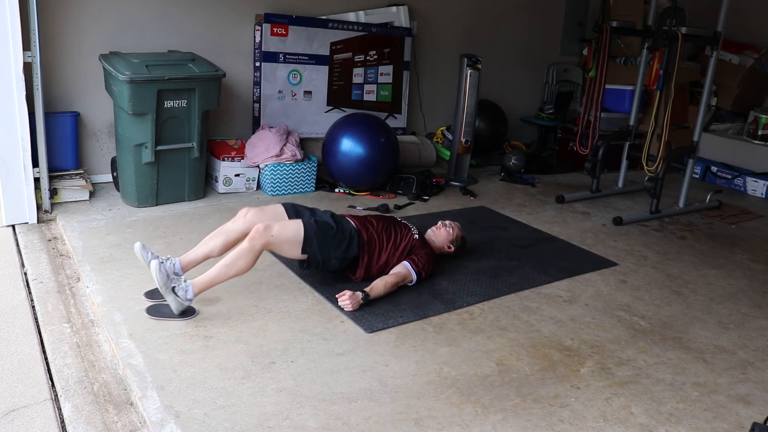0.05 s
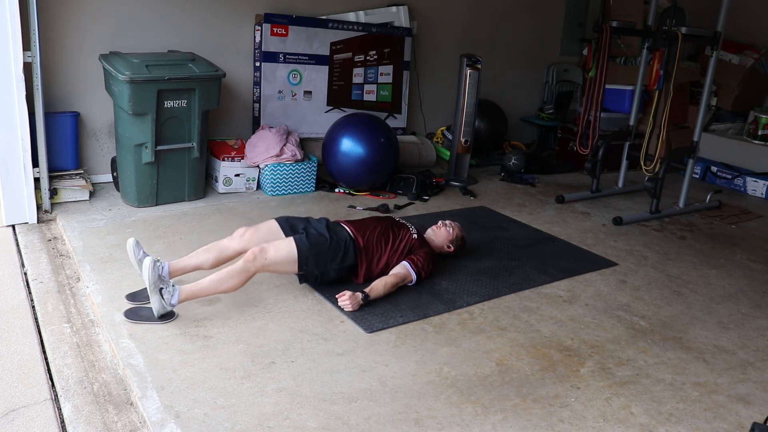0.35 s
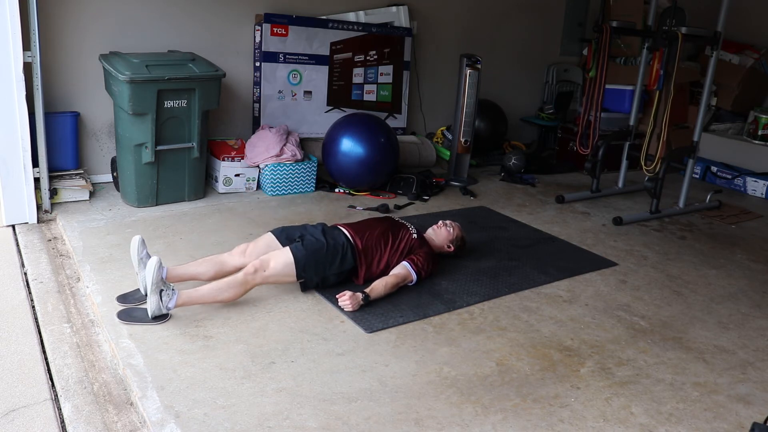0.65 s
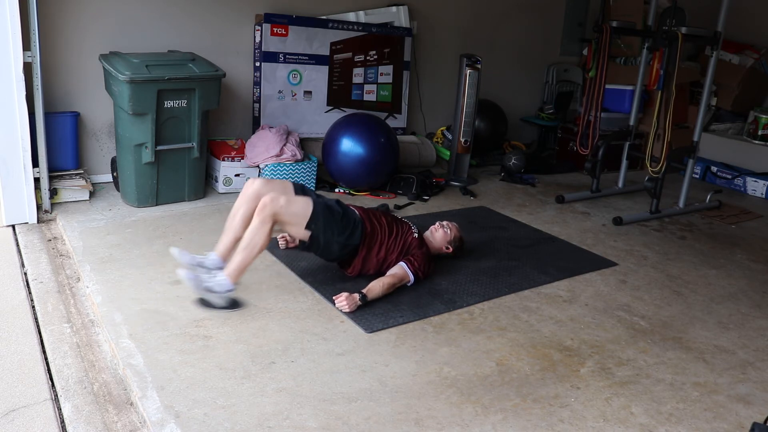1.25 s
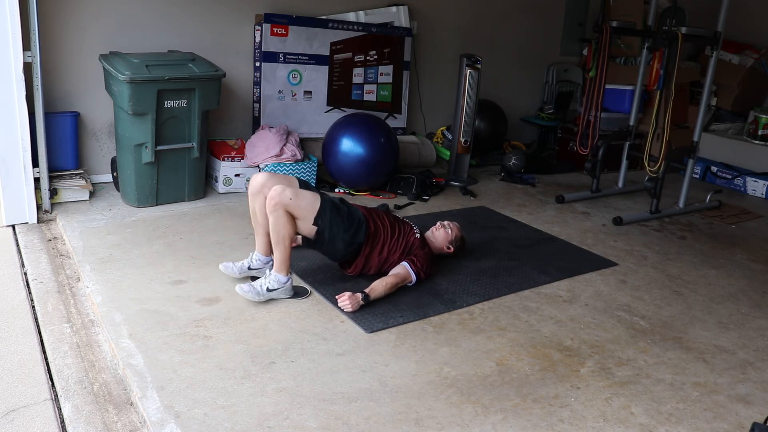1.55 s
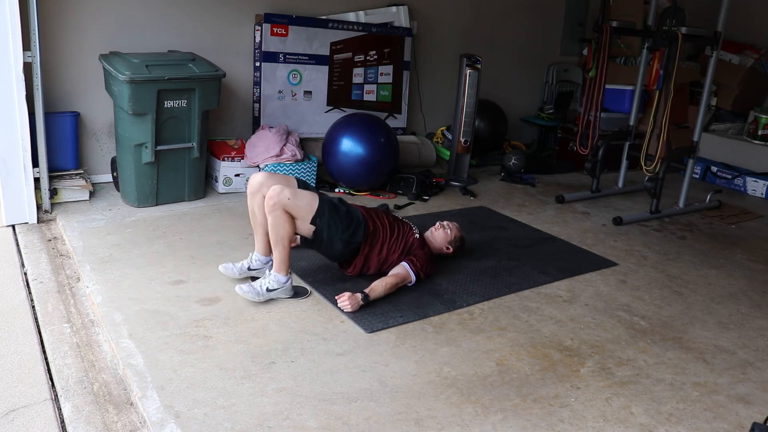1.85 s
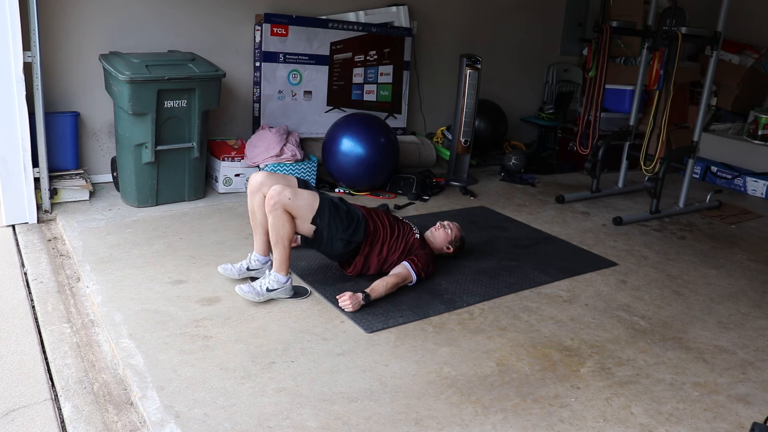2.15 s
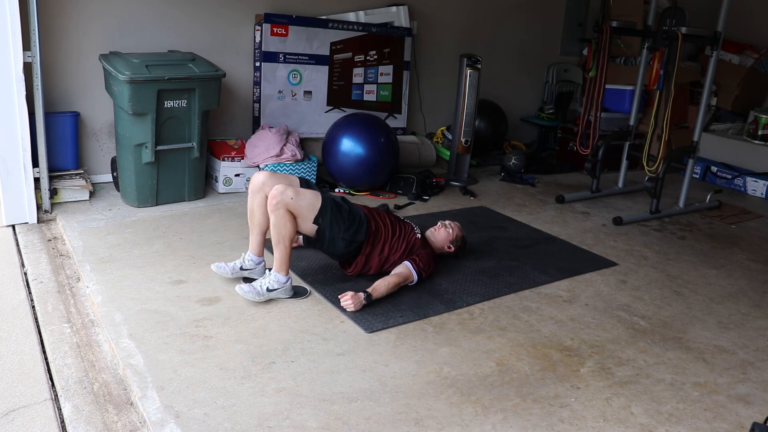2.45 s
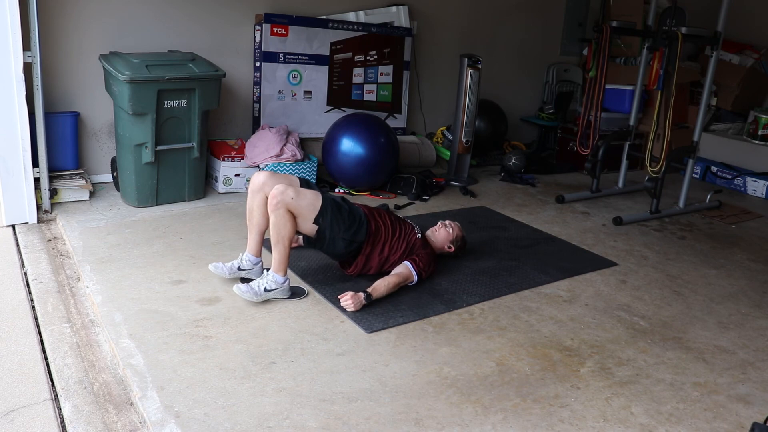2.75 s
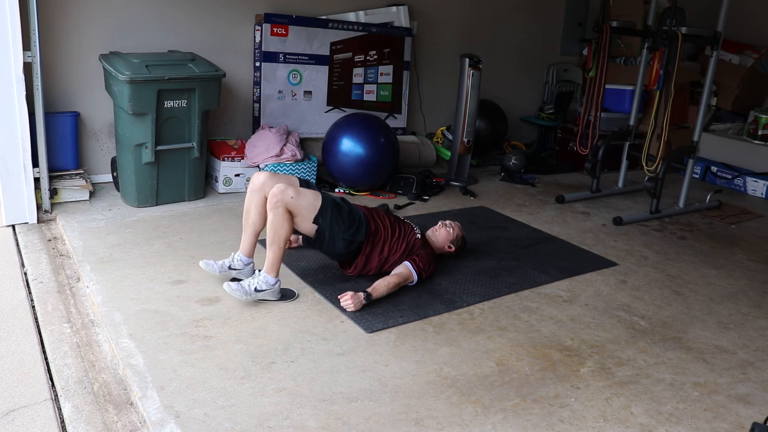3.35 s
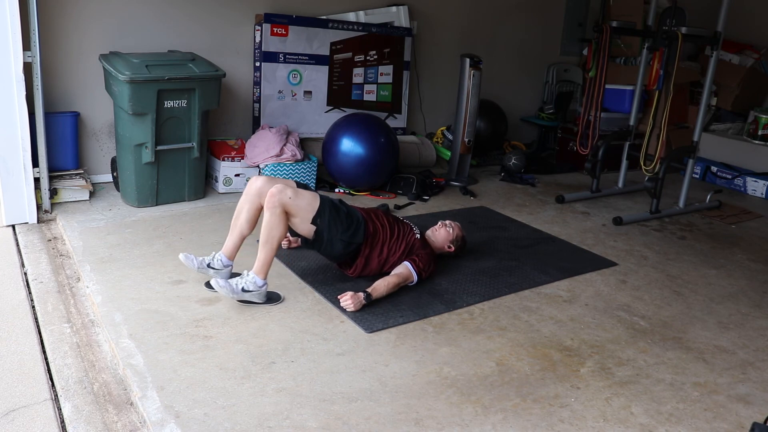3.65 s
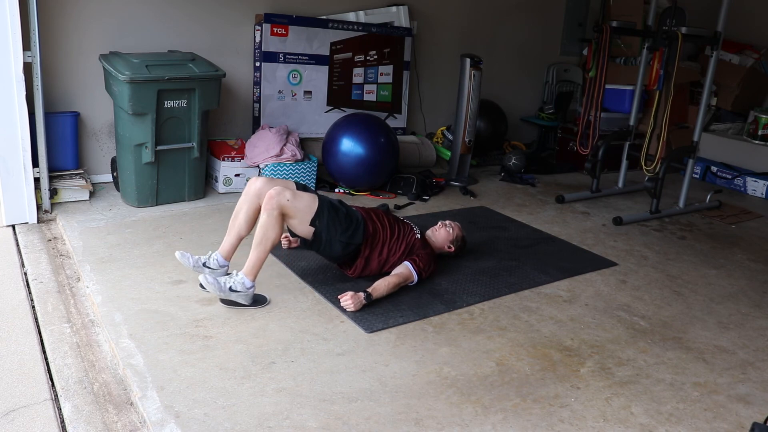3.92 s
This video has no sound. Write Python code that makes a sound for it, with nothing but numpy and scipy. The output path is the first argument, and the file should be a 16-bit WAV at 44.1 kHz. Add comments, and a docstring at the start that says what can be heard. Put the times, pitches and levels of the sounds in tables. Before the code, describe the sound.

Plastic exercise sliders scrape over concrete with a gritty hiss, slight ringing and small cracks until 0.7 seconds. After a pause comes the loudest, brightest scrape, from 1 to 1.6 seconds. Faint creeping follows from 2.3, then another scrape from 3.4 to the end, all with a short garage echo. Behind are a low rumble, a machine's quiet hum and whine, and a distant engine speeding up around 2 seconds.

```python
"""Two plastic exercise sliders scrape over the concrete floor of a garage: pushed out, pulled back fast,
creeping under the heels, then pushed out again. Grit hisses and cracks under them, rubbing makes the
discs ring, and the hard walls echo it all. Behind are a low rumble, a machine's hum and whine,
and a far engine that picks up speed."""
import sys
import numpy as np
from scipy import signal
from scipy.io import wavfile

SR = 44100
rng = np.random.default_rng(int(sys.argv[2]) if len(sys.argv) > 2 else 0)


def to_wav(sig):
    """Store sig (one row per channel, or 1-D mono) as 16-bit WAV at the path in sys.argv[1].

    Samples outside -1..1 are clipped; the rate is SR.
    """
    pcm = np.clip(np.atleast_2d(sig), -1, 1) * 32767
    pcm = np.round(pcm).astype(np.int16)
    wavfile.write(sys.argv[1], SR, pcm.T)  # frames by channels


N = 176400
TIME = np.arange(N) / SR

# How alike left and right are, for sliders and background: (frequency [Hz], likeness [1 = the same])
SLIDER_LIKENESS = [(500, 0.9), (1500, 0.65), (2700, 0.31), (5000, -0.13), (8000, -0.16), (15000, -0.12)]
ROOM_LIKENESS = [(30, 0.99), (120, .98), (350, 0.8), (700, 0.82), (1400, 0.33), (3000, 0.17), (12000, .1)]
# Which side is louder: (frequency [Hz], left minus right [dB])
SLIDER_PAN = [(1000, -1), (2700, -3), (5000, 0.5), (8000, 0), (14000, 2.3)]
ROOM_PAN = [(120, 0), (250, 1.5), (600, -1.2), (1400, -1), (4000, -2.5), (12000, -1)]


def sliding_effort():
    """How hard the sliders rub, as a level in dB: four moves with a slight judder."""
    # Each move: (time [s], level [dB])
    push_out = [(0, -35), (.25, -36), (.34, -31.5), (.45, -30.5), (.51, -27.5), (.6, -27.5), (.64, -31.5),
                (.69, -38.5), (.78, -55), (.9, -66)]
    pull_back = [(.945, -52), (.962, -42), (1.014, -36.5), (1.025, -29.5), (1.13, -27.5), (1.2, -24),
                 (1.26, -20.5), (1.32, -22), (1.5, -20.5), (1.58, -43.5), (1.7, -59), (1.82, -65.5)]
    creep = [(2.19, -59), (2.291, -49.5), (2.35, -44.5), (2.43, -43.5), (2.52, -44.5), (2.579, -54.5),
             (2.69, -49), (2.76, -45), (2.86, -49.5), (2.95, -49.5), (3.01, -41.5), (3.08, -41),
             (3.2, -53.5), (3.32, -48)]
    push_again = [(3.32, -49), (3.41, -43.5), (3.52, -33.5), (3.63, -33.5), (3.73, -34.5), (3.82, -37),
                  (3.89, -29.5), (3.95, -38.5)]
    effort_db, = in_time(push_out + pull_back + creep + push_again)
    judder_db = 0.46 * drift(rate_hz=30)
    return effort_db + judder_db


def scrape(effort_db):
    """The hiss of plastic on concrete grows louder and brighter with effort."""
    # Tone of the hiss: (frequency [Hz], relative level [dB])
    hiss_tone = [(500, -31), (1000, -17.5), (1500, -11.5), (2100, -3), (2700, 0.5), (3300, -2),
                 (4200, -0.5), (5400, -1.5), (7400, -0.5), (9500, -4), (12000, -9), (14000, -13.5),
                 (16000, -18.5)]
    # Lean towards the treble: (time [s], slope [dB per octave])
    treble_tilt = [(0, 0.3), (.65, -0.5), (1.05, -0.9), (1.4, 2), (1.7, -3), (2.4, 0.1), (3.1, -0.7),
                   (3.6, -0.2), (3.9, -1.5)]
    usual_effort_db = -35.5
    slope = in_time(treble_tilt)[0] + .13 * np.maximum(effort_db - usual_effort_db, -6)
    out = 0
    for hz, band in bands(grit(), hiss_tone, low_hz=496):
        flicker_db = 0.93 * drift(rate_hz=13)
        gain = from_db(slope * np.log2(hz / 6000) + flicker_db)
        out += gain * stereo(band, hz, SLIDER_LIKENESS, SLIDER_PAN)
    return out * from_db(effort_db + 3)


def grit(grains_per_s=5000, grain_share=0.48):
    """Tiny collisions of uneven size over smooth rubbing noise."""
    shape = (2, 2, N)
    sizes = from_db(np.minimum(rng.exponential(1, N), 5))
    hits = rng.random(N) < grains_per_s / SR
    grains = unit_power(hits * sizes * rng.standard_normal(shape))
    return np.sqrt(grain_share) * grains + np.sqrt(1 - grain_share) * rng.standard_normal(shape)


def disc_rings(effort_db, fade_s=0.017):
    """Rubbing makes the discs ring; the pitch glides as the heels press on them."""
    # (start [s], end [s], first pitch [Hz], last pitch [Hz], width [Hz], level added to effort [dB])
    rings = [(0, .27, 2513, 2486, 190, 0.5), (0.146, .19, 2133, 2130, 120, -3),
             (0.287, 0.359, 2230, 2002, 150, -4.5), (.335, 0.37, 1750, 1743, 110, -9),
             (.4, .82, 1976, 2016, 150, -8), (.38, .84, 2523, 2536, 140, -7),
             (0.953, 1.023, 2610, 2740, 280, -2.5), (1.024, 1.047, 2830, 2800, 280, 0),
             (1.08, 1.17, 2626, 2518, 170, -3), (1.2, 1.32, 2518, 2432, 170, -9),
             (1.01, 1.12, 1832, 1817, 90, -10), (1.17, 1.288, 1402, 1348, 600, -20),
             (1.193, 1.621, 2353, 2140, 550, -15), (3.451, 3.95, 2342, 2218, 299.8, -12.5)]
    out = 0
    for start, end, first_hz, last_hz, width_hz, db in rings:
        fade = np.clip(np.minimum(TIME - start, end - TIME) / fade_s + 1, 0, 1)
        steady = ringing_noise(first_hz, width_hz)
        # Reading the steady ring faster or slower bends its pitch.
        speed = np.interp(TIME, [start, end], [1, last_hz / first_hz])
        clock = np.cumsum(speed) / SR
        ring = [np.interp(clock % TIME[-1], TIME, side) for side in steady]
        out += fade * from_db(db) * stereo(ring, first_hz, SLIDER_LIKENESS, SLIDER_PAN)
    return out * from_db(effort_db)


def cracks():
    """Larger grains break under a rim in short, sharp bursts."""
    # (time [s], relative level [dB], decay time [s])
    breaks = [(0.17, -26, 0.0057), (.4369, -27, .002), (0.4564, -16.5, 0.002), (.4617, -8.5, 0.00069),
              (.464, -15, 0.0024), (0.47, -22, 0.0063), (0.473, -20, 0.0022), (0.477, -17, .001),
              (.6035, -20, 0.0046), (.6125, -23, 0.0065), (1.0217, -26.5, 0.0067), (2.2014, -44.5, .006),
              (2.4867, -33.5, 0.01), (2.631, -42.5, 0.014), (2.7217, -41, .012), (2.889, -39, .006),
              (3.8427, -31, .004), (3.8673, -24.5, 0.012), (3.8925, -30, .002)]
    # Tone of a crack: (frequency [Hz], relative level [dB])
    crack_tone = [(600, -33), (1500, -16), (2600, -2), (4000, -0.5), (7000, 4), (11000, -2.5),
                  (15500, -16.5)]
    loudness = 0
    for start, db, decay_s in breaks:
        dying_away = np.exp(-np.clip((TIME - start) / decay_s, 0, 20))
        loudness += from_db(db + 3) * (TIME >= start) * dying_away
    bursts = loudness * rng.standard_normal((2, 2, N)) + 1e-18
    return sum(stereo(band, hz, SLIDER_LIKENESS, SLIDER_PAN)
               for hz, band in bands(bursts, crack_tone, low_hz=562))


def garage_echo(sound, echo_s=0.52, echo_db=-6, dull_above_hz=11000):
    """Hard walls return a blurred, slightly dull echo that falls 60 dB in echo_s."""
    tail = rng.standard_normal((2, N)) * from_db(-60 * TIME / echo_s) * (TIME > .004)
    tail = signal.sosfilt(signal.butter(1, dull_above_hz, fs=SR, output="sos"), tail)
    tail = unit_power(tail) / np.sqrt(N)
    return from_db(echo_db) * signal.fftconvolve(sound, tail, axes=1)[:, :N]


def far_engine():
    """A far engine gathers speed and holds it; its tones waver and swell in turn."""
    # (time [s], firing rate [Hz], level [dB])
    run = [(0, 98, -61), (1.2, 104.3, -52), (1.82, 116.3, -42), (2.1, 130, -47.5), (2.45, 144, -45.5),
           (3.05, 146.4, -37.5), (3.55, 147.7, -43.5), (3.95, 147.2, -42.5)]
    # (multiple of the firing rate, relative level [dB])
    tones = [(.62, -3.5), (.81, -6.5), (1, -0.5), (1.39, -10.5), (1.63, -9.5), (2, -13), (3, -12.5),
             (4.4, -26)]
    # (peak time [s], half-length [s], multiple of the firing rate, extra level [dB])
    swells = [(1.85, 0.34, 3, 6), (1.85, .2, .62, 4.5), (2.9, 0.45, 3, 7.5), (2.6, .12, 2, 7),
              (3.7, 0.18, 2, 12)]
    firing_hz, run_db = in_time(run)
    out = 0
    for multiple, tone_db in tones:
        swell_db = sum(extra_db * np.exp(-((TIME - peak) / half_length) ** 2)
                       for peak, half_length, near, extra_db in swells if abs(near - multiple) < .25)
        hz = multiple * firing_hz * (1 + .007 * drift(rate_hz=11.9))
        waver_db = 1.5 * drift(rate_hz=4.9)
        out += sine(hz) * from_db(run_db + tone_db + swell_db + waver_db)
    return out


def machine():
    """A machine hums and whines, wavering a little, with whirring air."""
    # Hum and whine: (pitch [Hz], level [dB])
    tones = [(58.6, -47.5), (118.5, -50.5), (802.5, -54)]
    # Ringing air: (pitch [Hz], width [Hz], level [dB])
    whirrs = [(814, 76, -50.5), (3210, 400, -64.5), (5200, 540, -61.5)]
    out = 0
    for hz, db in tones:
        tone = np.sqrt(2) * sine(hz + .8 * drift(rate_hz=1.94))
        out += tone * from_db(db + 1.5 * drift(rate_hz=2.9))
    for hz, width_hz, db in whirrs:
        air = ringing_noise(hz, width_hz)
        out = out + from_db(db) * stereo(air, hz, ROOM_LIKENESS, ROOM_PAN)
    return out


def rumble(level_db=-40.5):
    """The steady, low noise of the garage."""
    # (frequency [Hz], relative level [dB])
    rumble_tone = [(22, -26), (30, -18), (39, -7), (52, -0.5), (68, -3), (88, 0), (120, -1), (170, -10.5),
                   (260, -10.5), (420, -7), (650, -8), (1000, -13.5), (1600, -14.5), (2600, -19),
                   (4000, -28), (5200, -23), (7000, -50), (15000, -39)]
    noise = rng.standard_normal((2, 2, N))
    return from_db(level_db) * sum(stereo(band, hz, ROOM_LIKENESS, ROOM_PAN)
                                   for hz, band in bands(noise, rumble_tone, low_hz=20.3))


def from_db(db):
    """Turn decibels into a factor to multiply by."""
    return 10 ** (np.asarray(db) / 20)


def unit_power(x):
    """Scale a signal to an average power of 1."""
    return x / np.sqrt(np.mean(x ** 2) + 1e-20)


def in_time(rows):
    """Join a table's timed points with lines: one curve for each column after the time."""
    times, *columns = np.transpose(rows)
    return [np.interp(TIME, times, column) for column in columns]


def at_hz(rows, hz):
    """Look up a table at one frequency, with octaves evenly spaced."""
    frequencies, values = np.transpose(rows)
    return np.interp(np.log(hz), np.log(frequencies), values)


def sine(hz):
    """A pure tone that follows a changing pitch."""
    return np.sin(2 * np.pi * np.cumsum(hz) / SR)


def drift(rate_hz):
    """A smooth random wander of typical size 1."""
    step, warm_up = 40, 2000
    r = np.exp(-2 * np.pi * step * rate_hz / SR)
    noise = rng.standard_normal(N // step + warm_up + 2)
    slow = signal.lfilter([1], [1, -2 * r, r * r], noise)[warm_up:]
    return np.interp(np.arange(N) / step, np.arange(len(slow)), unit_power(slow))


def ringing_noise(hz, width_hz):
    """Two noises, each filtered twice so that it rings around one pitch."""
    r = np.exp(-np.pi * width_hz * np.sqrt(2) / SR)
    resonance = [1 - r, 0, r - 1, 1, -2 * r * np.cos(2 * np.pi * hz / SR), r * r]
    return unit_power(signal.sosfilt([resonance, resonance], rng.standard_normal((2, N))))


def stereo(pair, hz, likeness_table, pan_table):
    """Mix two unrelated signals into left and right, as the tables say for this frequency."""
    likeness, pan_db = at_hz(likeness_table, hz), at_hz(pan_table, hz)
    sides = np.array([[1], [-1]])
    shared = np.sqrt((1 + likeness) / 2) * pair[0]
    opposite = np.sqrt((1 - likeness) / 2) * pair[1] * sides
    return (shared + opposite) * from_db(sides * pan_db / 2)


def bands(noise_pairs, tone, low_hz):
    """Cut two noise pairs, in turn, into third-octave bands shaped by tone; yield (Hz, pair)."""
    edges = np.geomspace(low_hz, 17000, int(3 * np.log2(17000 / low_hz)))
    centres = np.sqrt(edges[1:] * edges[:-1])
    gains = from_db(at_hz(tone, centres))
    gains /= np.sqrt(np.sum(gains ** 2 * np.diff(edges)) * 2 / SR)  # keep the total power
    for k, hz in enumerate(centres):
        band_filter = signal.butter(2, edges[k:k + 2], "band", fs=SR, output="sos")
        yield hz, gains[k] * signal.sosfilt(band_filter, noise_pairs[k % 2])


def scene():
    """The sliders and their echo, over the background."""
    effort_db = sliding_effort()
    sliders = scrape(effort_db) + disc_rings(effort_db) + cracks()
    left, right = rumble() + machine() + far_engine()
    lag_s = .00005  # the background reaches the left microphone first
    background = np.array([left, np.interp(TIME - lag_s, TIME, right)])
    return sliders + garage_echo(sliders) + background


def record(dry, limit_db=-7, recovery_db_per_s=71, end_s=3.952, top_hz=15850):
    """A limiter dips the level after sharp peaks; the top treble is cut and the sound stops at end_s."""
    peak_db = 20 * np.log10(np.abs(dry).max(axis=0) + 1e-9)
    over_db = np.maximum(peak_db - limit_db, 0)
    recovery_db = recovery_db_per_s * TIME
    dip_db = np.maximum.accumulate(over_db + recovery_db) - recovery_db
    dip_db = signal.sosfilt(signal.butter(1, 25, fs=SR, output="sos"), dip_db)  # soften the dips
    limited = np.clip(dry * from_db(-dip_db), -1, 1)
    fade_out = np.clip((end_s - TIME) / 0.0027 + 1, 0, 1)
    return signal.sosfilt(signal.ellip(12, .1, 80, top_hz, fs=SR, output="sos"), limited * fade_out)


dry = scene()
out = record(dry)
to_wav(out)
```